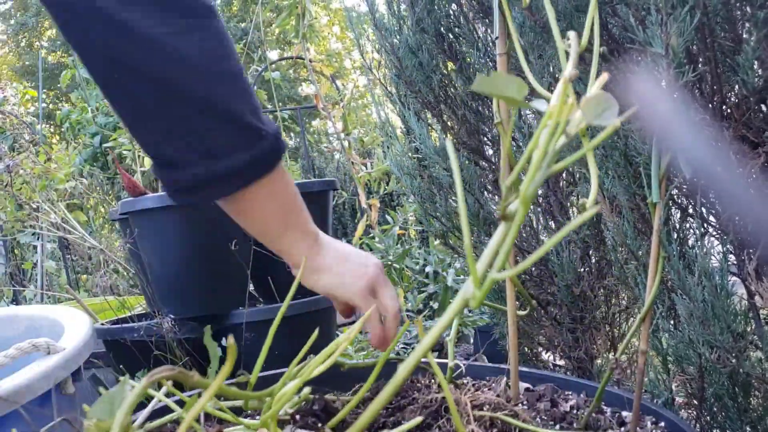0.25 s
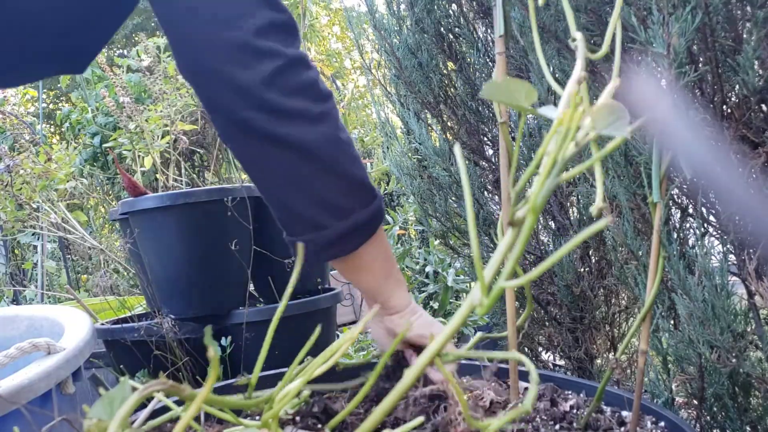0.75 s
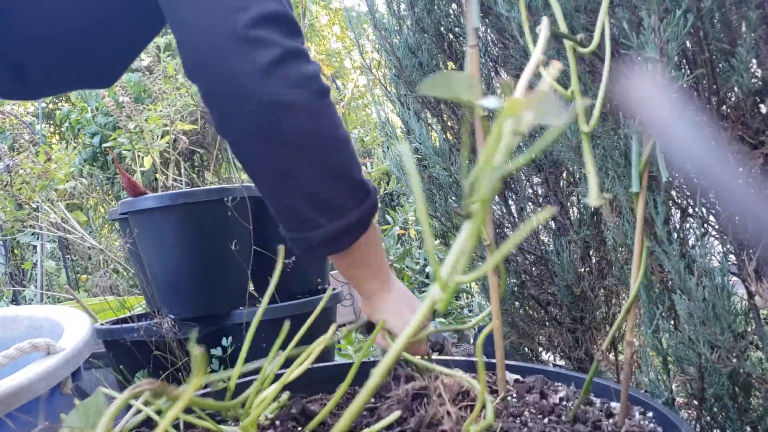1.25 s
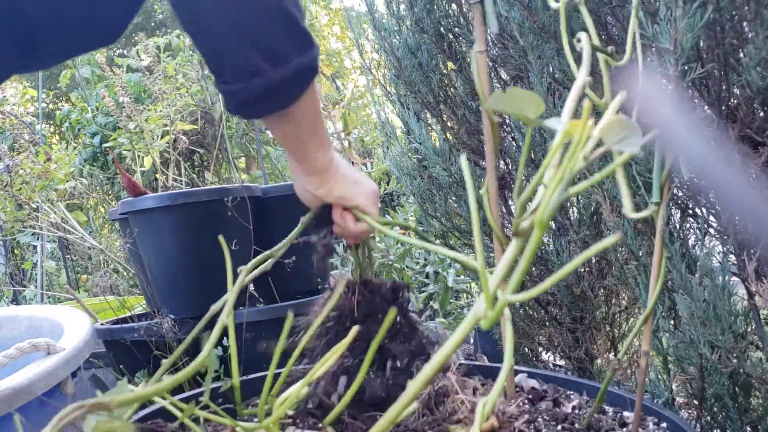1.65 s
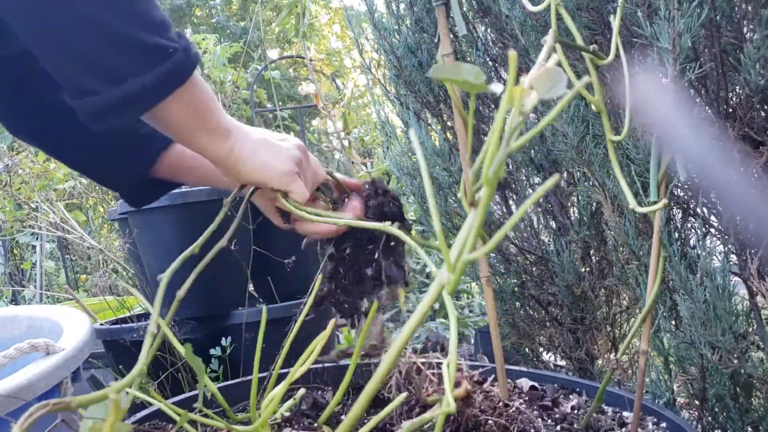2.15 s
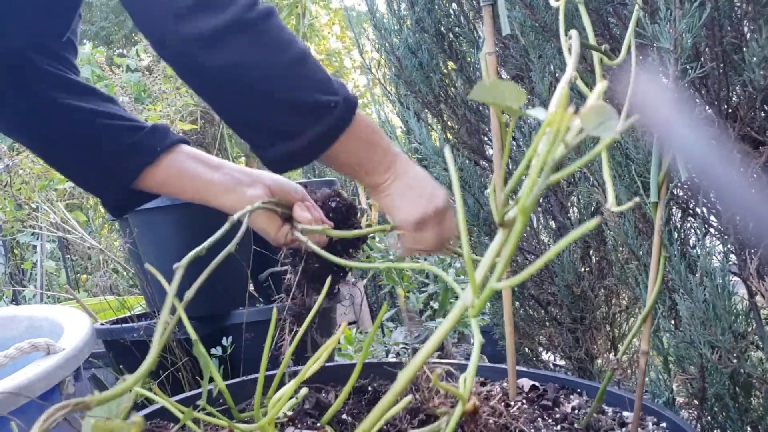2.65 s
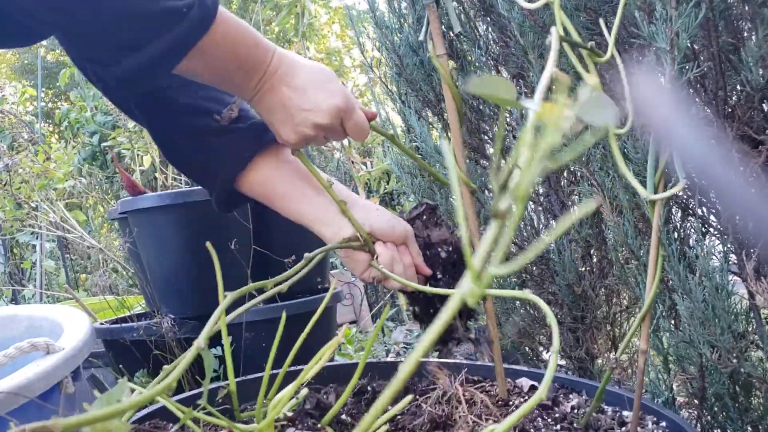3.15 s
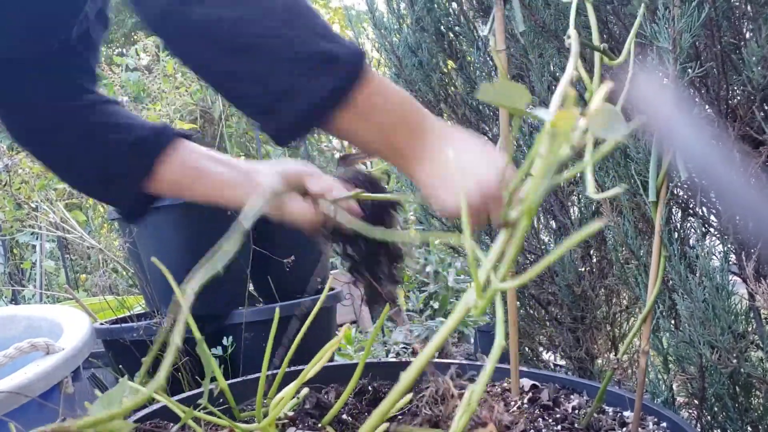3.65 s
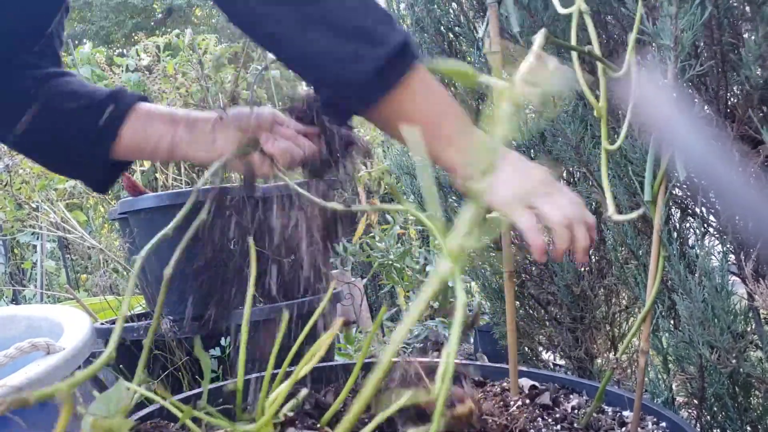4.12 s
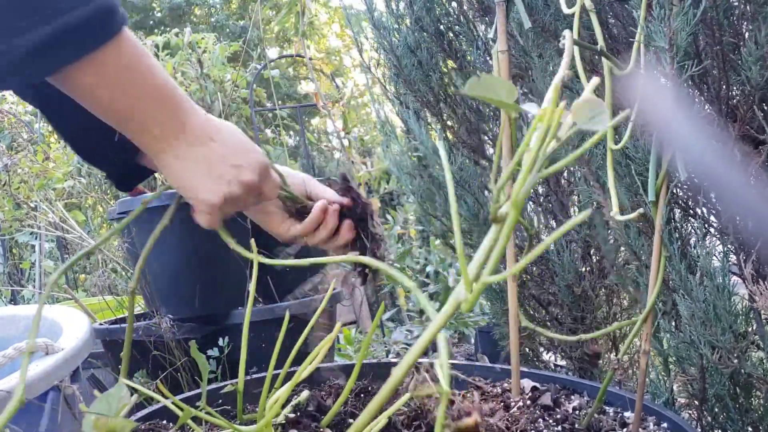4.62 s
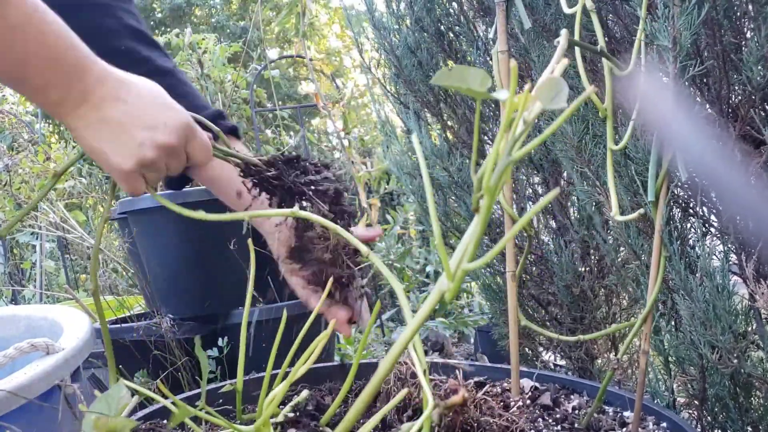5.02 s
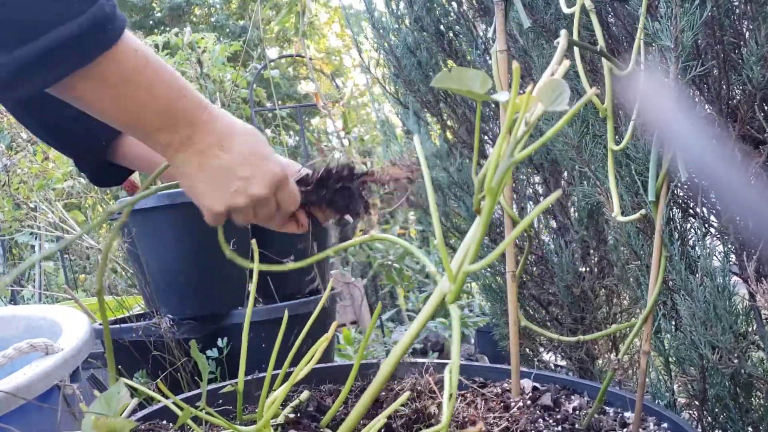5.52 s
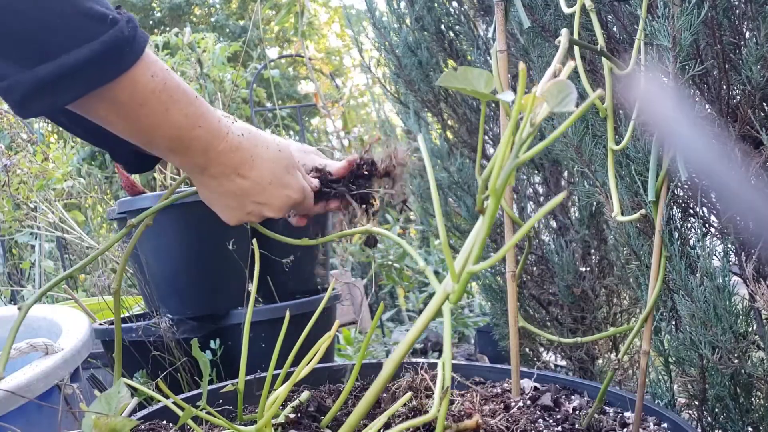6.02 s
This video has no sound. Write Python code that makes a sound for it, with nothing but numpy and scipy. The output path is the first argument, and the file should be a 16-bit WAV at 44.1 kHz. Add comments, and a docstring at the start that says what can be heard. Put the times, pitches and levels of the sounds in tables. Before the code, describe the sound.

Close, dry crackle of breaking roots, crumbling clods and spilling soil grains outdoors, with a faraway motor throbbing low underneath.

```python
"""Close to a tub of potting soil, hands work a root ball loose, with an engine droning and rumbling far off.
A few crumbs trickle and foliage rubs the sleeve; at half a second the first pull tears hair roots.
Thicker roots snap as ragged bursts of noise, the loudest near 3.9 s, and jolts spill grains of soil.
A breeze thuds on the right microphone from about one second on, in puffs of low noise.
From 1.3 s clods knock, as damped tones, and crunch as they fall apart."""
import sys
import numpy as np
from scipy import signal
from scipy.fft import rfft, irfft
from scipy.io import wavfile
from scipy.ndimage import map_coordinates

SR = 44100
rng = np.random.default_rng(int(sys.argv[2]) if len(sys.argv) > 2 else 0)


def to_wav(sig):
    """Store sig (one row per channel, or 1-D mono) as 16-bit WAV at the path in sys.argv[1].

    Samples outside -1..1 are clipped; the rate is SR.
    """
    pcm = np.clip(np.atleast_2d(sig), -1, 1) * 32767
    pcm = np.round(pcm).astype(np.int16)
    wavfile.write(sys.argv[1], SR, pcm.T)  # frames by channels


N = 276948
TIME = np.arange(N) / SR
HALF_APART = np.array([[.5], [-.5]])  # shares a left-right difference: left up, right down


def from_db(db):
    """Decibels to gain."""
    return 10 ** (np.asarray(db) / 20)


def rms_one(x):
    """Scale to rms 1."""
    return x / np.sqrt(np.mean(x ** 2) + 1e-20)


def in_time(rows):
    """Each column of a curve, interpolated at every sample."""
    seconds, *columns = np.transpose(rows)
    return [np.interp(TIME, seconds, column) for column in columns]


def drift(rate):
    """Slow random motion of spread 1, through rate random points per second."""
    knots = rng.standard_normal(4096)
    slow = map_coordinates(knots, [TIME[::32] * rate], order=3, mode="wrap")
    return rms_one(slow).repeat(32)[:N]


def colour(x, spectrum, size=1024):
    """Causal (minimum-phase) filter per channel; the two together keep the mean power of white noise."""
    hz, *sides = np.transpose(spectrum)
    log_hz = np.log(np.maximum(np.arange(size // 2 + 1) * SR / size, 1))
    gain = from_db([np.interp(log_hz, np.log(hz), db) for db in sides])
    # folding the cepstrum onto positive time gives minimum phase
    cepstrum = irfft(np.log(gain))
    cepstrum[:, 1:size // 2] *= 2
    cepstrum[:, size // 2 + 1:] = 0
    pulse = rms_one(irfft(np.exp(rfft(cepstrum)))) / np.sqrt(size)
    return signal.fftconvolve(np.broadcast_to(x, (2, N)), pulse, axes=1)[:, :N]


def add(track, s, sound):
    """Mix a short sound in at time s."""
    start = int(np.clip(s * SR, 0, N - 1))
    track[:, start:start + sound.shape[-1]] += sound[..., :N - start]


def scatter(x, t60, wet_db):
    """Pots, leaves and arms throw back a short diffuse tail, different on each side."""
    t = TIME[:SR // 4]
    tail = rng.standard_normal((2, len(t))) * from_db(-60 * t / t60)
    tail = rms_one(tail) / np.sqrt(len(t))
    return x + from_db(wet_db) * signal.fftconvolve(x, tail, axes=1)[:, :N]


def grains(per_s, spread_db, clump_db, clump_rate, pan_db, count=7):
    """Tiny fractures of uneven size that come in clumps, each ringing briefly in one of several bands; rms 1."""
    born = rng.random(N) < per_s / SR
    own_db = spread_db * np.minimum(rng.exponential(1, N), 3)
    shared_db = clump_db * np.minimum(drift(clump_rate), 2)
    pan = from_db(pan_db * rng.uniform(-1, 1, N) * [[1], [-1]])
    clicks = born * from_db(own_db + shared_db) * rng.choice([-1, 1], (2, N)) * pan
    edges = np.linspace(np.sqrt(200), np.sqrt(17000), count + 1) ** 2
    dealt, out = rng.integers(0, count, N), 0
    for k in range(count):
        band = signal.butter(2, edges[k:k + 2], "band", fs=SR, output="sos")
        out = out + signal.sosfilt(band, clicks * (dealt == k) + 1e-18)
    return rms_one(out)


def gesture(start, db, attack_s, hold_s, fall_db_per_s):
    """Gain that rises, holds until hold_s after the start, then dies away."""
    t = TIME - start
    rise = np.clip(t / attack_s, 0, 1)
    return rise * from_db(db - fall_db_per_s * np.maximum(t - hold_s, 0))


def together(gains):
    """Unrelated noises add in power."""
    return np.sqrt(sum(gain ** 2 for gain in gains))


def engine(waver_db=1.97, lag_s=0.00033, apart_db=2.5):
    """Tones on the multiples of the cycle rate beat together in a soft throb, later on the left microphone."""
    # Engine speed. Each row: time in seconds, working cycles per second.
    speed_curve = [(0, 25.0), (.5, 24.95), (1.4, 24.8), (1.8, 24.5), (2.35, 24.85), (3.2, 24.55),
                   (3.5, 24.7), (4.0, 24.6), (4.6, 25.1), (5.1, 25.45), (5.5, 25.4), (5.8, 25.0),
                   (6.28, 25.3)]
    # Distant loudness. Each row: time in seconds, level of the main tone (4th multiple) in dB, its octave in dB.
    main_levels = [(0.08, -42, -51), (0.67, -41, -51), (1.01, -43, -47), (2.42, -37.5, -54),
                   (2.87, -39.5, -51), (4.37, -38, -51.5), (4.64, -37.5, -61), (5.14, -42, -52),
                   (5.28, -50, -53.5), (5.55, -43, -62), (5.92, -40.5, -53.5), (6.14, -46, -57)]
    # The other tones. Each row: multiple of the cycle rate, level in dB before fading.
    other_tones = [(2, -58), (3, -55), (5, -48.5), (6, -53), (7, -56), (9, -67.5), (10, -86), (12, -52.5),
                   (13, -69.5)]
    speed = in_time(speed_curve)[0]
    turns = np.cumsum(speed) / SR - lag_s * speed * np.array([[1], [0]])
    main_db, octave_db = in_time(main_levels)
    # moving air makes each of the other tones fade and wander a little
    fade_db = .25 * (main_db - main_db.mean())
    tones = [(order, db + fade_db + waver_db * drift(3.033)) for order, db in other_tones]
    tones += [(4, main_db), (8, octave_db)]
    out = np.zeros((2, N))
    for order, db in tones:
        # the exhaust pipe smears each pulse: the higher tones come out later
        phase = -.45 * (order - 4) ** 2 + .2 * drift(4)
        sides = apart_db * drift(1.725) * HALF_APART
        out -= from_db(db + sides) * np.cos(2 * np.pi * order * turns + phase)
    return np.sqrt(2) * out


def background(apart_db=-9, air_db=-56):
    """Low distant rumble, nearly alike on both microphones, under a faint hiss."""
    # Rumble spectrum. Each row: frequency in Hz, relative level in dB per Hz.
    rumble = [(20, -50), (35, -0.5), (55, 7), (90, 5), (140, -4), (220, -4), (270, -10.5), (330, -9.5),
              (420, -21), (600, -24), (1000, -40.5)]
    # Garden air and hiss. Each row: frequency in Hz, left and right relative level in dB per Hz.
    air = [(382, 2.5, 2), (524, -9, -10), (1000, -15.5, -17.5), (1520, -4.5, -16.5), (2350, -23.5, -18),
           (4720, -47, -11.5), (7000, -17, -25), (8750, -45, -82), (11300, -43, -22), (15500, -20, -48)]
    # Swell of the rumble. Each row: time in seconds, level in dB.
    swell = [(0, -45.5), (.8, -43), (1.5, -43), (2.4, -46), (3.5, -46.5), (4.2, -41), (5.0, -44),
             (5.7, -48.5), (6.28, -45)]
    noise = rng.standard_normal(N) + from_db(apart_db) * rng.standard_normal(N) * [[1], [-1]]
    lowpass = signal.butter(2, 900, fs=SR, output="sos")
    low = signal.sosfilt(lowpass, colour(noise, rumble, size=8192))
    hiss = colour(rng.standard_normal((2, N)) + 0.34 * rng.standard_normal(N), air)
    return from_db(in_time(swell)[0]) * rms_one(low) + from_db(air_db) * rms_one(hiss)


def soil_flow(attack_s=0.021, idle_db=-71):
    """Gain of the falling soil, left and right: jolts spill soil over a thin steady trickle."""
    # Each row: start in seconds, level in dB, time pouring in seconds, fall in dB per second,
    # left-right difference in dB.
    spill_rows = [(-.03, -62.5, 0.18, 90, 13.5), (.54, -53, 0.2, 16, -2), (1.27, -49, 0.035, 58, -5),
                  (1.46, -50, .16, 25, -1.5), (1.78, -57.5, 0.34, 160, -4), (2.27, -57.5, 0.064, 140, 1),
                  (2.73, -59.5, 0.053, 18, 0), (3.53, -61, 0.054, 119, -3), (3.7, -63, 0.21, 50, 0.5),
                  (3.895, -50.5, 0.042, 15, 0.5), (4.17, -49, 0.46, 35, 0), (5.28, -58.5, 0.1, 90, 2),
                  (5.49, -58.5, 0.068, 49, -2)]
    spills = [gesture(s, db + pan_db * HALF_APART, attack_s, hold_s, fall)
              for s, db, hold_s, fall, pan_db in spill_rows]
    return together([from_db(idle_db)] + spills)


def soil(coarse_db=-3):
    """Fine soil trickles as dense small fractures, with sparser, coarser crumbs ticking through it."""
    # Falling and rubbed soil. Each row: frequency in Hz, left and right relative level in dB per Hz.
    soil_spectrum = [(243, -27.5, -13.5), (600, 3, -2), (1200, -8, -8), (1900, -4, -9), (3160, -10, -9.5),
                     (4930, -11, 0), (6400, -2, -2.5), (8460, -7, -21), (10100, 1.5, -6), (12750, 6, -2),
                     (16600, 1.5, -27)]
    flow = soil_flow()
    fine = grains(per_s=10000, spread_db=4, clump_db=2.5, clump_rate=200, pan_db=3)
    coarse = grains(per_s=1200, spread_db=4.5, clump_db=3.8, clump_rate=140, pan_db=4)
    return colour(flow * (fine + from_db(coarse_db) * coarse), soil_spectrum)


def leaves(attack_s=0.02, fall_db_per_s=41, idle_db=-70):
    """Soft, uneven friction of foliage against the sleeve, a mass of small slips."""
    # Arm sweeps through stems and leaves. Each row: start in seconds, level in dB, length in seconds.
    sweep_rows = [(0.224, -62, 0.082), (1.32, -58, 0.46), (1.84, -60.5, 0.39), (3.925, -60, 0.85)]
    # Brushing. Each row: frequency in Hz, left and right relative level in dB per Hz.
    brush_spectrum = [(800, -8, -27.5), (2040, -6, -8.5), (3700, 0, 4.5), (5900, -4, 5), (7330, -2, 0),
                      (9200, -16, -34), (14500, 0.5, -16)]
    sweeps = [gesture(s, db, attack_s, hold_s, fall_db_per_s) for s, db, hold_s in sweep_rows]
    rub = grains(per_s=5000, spread_db=3.5, clump_db=1.5, clump_rate=90, pan_db=3)
    return colour(together([from_db(idle_db)] + sweeps) * rub, brush_spectrum)


def rootlets(per_s=7, mean_db=-53.5, spread_db=2, t60_s=.005, tilt_db=7, pan_spread_db=4, follow=0.74):
    """Rootlets part at random moments, stronger while much soil is moving; rows as in snaps()."""
    flow_db = 20 * np.log10(soil_flow().mean(axis=0))
    draws = rng.random((200, 4))
    times = np.cumsum(-np.log(1 - draws[:, 0])) / per_s
    strength, tilt, pan = (2 * draws[:, 1:] - 1).T
    # follow is the share of the soil flow's swing that the ticks take on
    swing_db = follow * np.interp(times, TIME, flow_db - flow_db.mean())
    db = mean_db + spread_db * strength + swing_db
    t60s = np.full_like(times, t60_s)
    rows = np.transpose([times, db, t60s, tilt_db * (1 + tilt), pan_spread_db * pan])
    return [tuple(row) for row in rows if row[0] < TIME[-1]]


def snaps(ragged_db=4, split_hz=8000, rise_share=0.031):
    """A root breaks in a ragged burst of fibres; the tougher it is, the slower the burst builds and dies."""
    # Roots and stems. Each row: time in seconds, level in dB before tilt and colour, time to fall 60 dB
    # in seconds, tilt to the treble in dB, left-right difference in dB.
    snap_rows = [(0.572, -41.5, .011, -22, 3), (.663, -33.5, .012, -12, -2), (.737, -35, .008, 2, -10),
                 (0.8598, -29, 0.028, 0, 0.5), (0.9198, -33, 0.0028, 7, -4), (1.071, -44.5, .005, 23, 1),
                 (1.282, -37.5, 0.015, -6, 3), (1.298, -22.5, 0.014, -3, 4),
                 (1.4757, -39.5, .0045, -22, -11), (1.642, -33, 0.0053, -11, -10),
                 (1.716, -35.5, 0.005, 10, 6), (2.049, -35, 0.0025, 15, 7), (2.0765, -39, .008, 12, -4),
                 (2.38, -46.5, 0.0096, 25, 0), (2.742, -34.5, 0.023, 18, 2), (2.764, -35.5, 0.015, -8, -6),
                 (2.796, -30, 0.0072, 5, 1), (2.809, -32, 0.014, 5, -2), (2.8365, -44, 0.0074, 20, 5),
                 (2.8745, -38.5, 0.0051, 12, 7), (3.0808, -32, 0.0051, 9, 4), (3.114, -37.5, 0.013, 5, -4),
                 (3.1461, -27.5, 0.01, 8.5, -1), (3.3458, -39.5, 0.005, 2, -4), (3.71, -48, .012, 13, -1),
                 (3.8052, -41, 0.0066, 18, 3), (3.9037, -14.5, 0.0077, -6, 0), (3.977, -29, .01, 8, -2.5),
                 (4.114, -39, 0.02, -9, 0), (4.206, -41.5, 0.014, -24, -9), (4.27, -36.5, .005, -14, -11),
                 (4.3052, -21, 0.0055, -3, -1), (4.604, -42, 0.022, -18, -8), (4.83, -43, .008, -15, 1),
                 (5.3793, -38.5, 0.015, 16, 11), (5.3967, -34.5, 0.02, 15.5, 12.5),
                 (5.399, -26, 0.013, -7, 0), (5.514, -36.5, .007, 3, -2), (5.771, -47.5, 0.0076, 7, 11),
                 (6.211, -43.5, .006, 1, -2)]
    # Snapping roots. Each row: frequency in Hz, left and right relative level in dB per Hz.
    snap_spectrum = [(250, -31, -27), (600, -19, -17), (1200, -20, -28), (2200, -19, -22), (3300, -22, -18),
                     (4700, -12, -8), (6300, -7, -4), (8400, -9, -20), (10500, -4, -11), (12500, 0, -9),
                     (15500, -3, -20)]
    t, out = TIME[:SR // 16], np.zeros((2, N))
    lowpass = signal.butter(2, split_hz, fs=SR, output="sos")
    highpass = signal.butter(2, split_hz, "high", fs=SR, output="sos")
    for s, db, t60, tilt_db, pan_db in [*snap_rows, *rootlets()]:
        # each fibre's strength lasts 12 samples
        fibres = from_db(ragged_db * rng.standard_normal(len(t))).repeat(12)[:len(t)]
        shape = (1 - np.exp(-t / (rise_share * t60))) * from_db(-60 * t / t60)
        burst = rng.standard_normal((2, len(t))) * fibres * shape
        # energy in proportion to the decay time
        burst *= np.sqrt(2 * SR * t60 / np.log(1e6) / np.sum(burst ** 2))
        treble = from_db(tilt_db / 2) * signal.sosfilt(highpass, burst)
        bass = from_db(-tilt_db / 2) * signal.sosfilt(lowpass, burst)
        add(out, s, (treble - bass) * from_db(db + pan_db * HALF_APART))
    return scatter(colour(out, snap_spectrum), t60=.06, wet_db=-10)


def tearing(lift_db=3, attack_s=0.01, fall_db_per_s=155):
    """Hair roots give way by the thousand as the strain builds quickly and lets go."""
    # Pulls. Each row: start in seconds, level in dB before the lift, time under strain in seconds.
    pull_rows = [(.545, -54.5, .32), (.655, -43, 0.037), (.725, -47.5, 0.078), (2.728, -51, 0.11),
                 (3.12, -59, 0.081), (5.32, -57.5, 0.086)]
    # Tearing roots. Each row: frequency in Hz, left and right relative level in dB per Hz.
    tear_spectrum = [(250, -44, -30), (600, -39, -28), (1200, -11, -15), (2100, -7, -11), (3300, -13, -6.5),
                     (4780, -12, -3.5), (6350, -7, -3.5), (8450, -11.5, -18), (11100, -0.5, -5),
                     (12400, -1, -4), (15600, -2.5, -29)]
    pull = together(gesture(s, db, attack_s, hold_s, fall_db_per_s) for s, db, hold_s in pull_rows)
    fibres = grains(per_s=9000, spread_db=5, clump_db=3.5, clump_rate=240, pan_db=4)
    return from_db(lift_db) * colour(pull * fibres, tear_spectrum)


def breeze(left_db=-19):
    """Eddies buffet the right microphone's port with short low thuds, far weaker on the left."""
    # Puffs. Each row: time of the peak in seconds, level in dB, time from the peak to 1/e in seconds.
    puffs = [(0.958, -34, 0.018), (3.954, -33.5, .04), (4.575, -46, 0.043), (2.999, -27, 0.016),
             (3.14, -33, 0.13), (3.301, -18.5, 0.0073), (3.482, -31.5, 0.07), (3.73, -33, 0.065),
             (4.779, -29, 0.011), (5.854, -41, 0.17)]
    gust = sum(from_db(db) * np.exp(-((TIME - s) / length) ** 2) for s, db, length in puffs)
    band = signal.butter(2, [45, 85], "band", fs=SR, output="sos")
    lowpass = signal.butter(2, 130, fs=SR, output="sos")
    eddies = signal.sosfilt(band, rng.standard_normal(N))
    eddies = signal.sosfilt(lowpass, np.tanh(2 * rms_one(eddies)))
    return gust * rms_one(eddies) * from_db([[left_db], [0]])


def clods(left_db=2, right_db=-3, crush_db=-1, crush_t60=0.055, crush_hz=2200):
    """Each clod gives a dull knock, quickly damped by the soil, and a short crunch as it falls apart."""
    # Clods that tear loose or land in the tub. Each row: time in seconds, level in dB before the
    # left and right gains, pitch of the knock in Hz.
    clod_rows = [(1.321, -37.5, 1520), (1.349, -30.5, 1100), (1.405, -40, 1000), (1.4215, -38.5, 600),
                 (1.475, -38.5, 1100), (1.491, -42, 1420), (1.76, -48, 1070), (3.904, -38.5, 550),
                 (4.107, -44.5, 910), (4.152, -46, 1200), (4.324, -32.5, 785), (4.325, -36.5, 1390),
                 (4.344, -43, 900), (4.603, -39.5, 800), (4.635, -39.5, 500), (4.829, -43.5, 1850)]
    # Modes of a knock. Each row: ratio to its pitch, relative level in dB, time to fall 60 dB in seconds.
    knock_modes = [(.52, -1.5, 0.0055), (1, -1.5, 0.017), (1.8, -10, 0.0057)]
    t, out = TIME[:SR // 12], np.zeros((2, N))
    dull = signal.butter(1, [450, crush_hz], "band", fs=SR, output="sos")
    for s, db, hz in clod_rows:
        knock = sum(from_db(mode_db - 60 * t / t60) * np.sin(2 * np.pi * hz * ratio * t)
                    for ratio, mode_db, t60 in knock_modes)
        crush = signal.sosfilt(dull, rng.standard_normal((2, len(t))) * from_db(-60 * t / crush_t60))
        add(out, s, from_db(db) * (knock + from_db(crush_db) * crush))
    return scatter(out, t60=.04, wet_db=-10) * from_db([[left_db], [right_db]])


def scene():
    """The work at the tub over the sounds of the garden."""
    garden = engine() + background() + breeze()
    return garden + soil() + leaves() + snaps() + tearing() + clods()


def record(dry):
    """The deepest bass is rolled off below 30 Hz and the top is cut steeply above 16 kHz."""
    dry = signal.sosfilt(signal.butter(2, 30, "high", fs=SR, output="sos"), dry)
    return signal.sosfilt(signal.ellip(12, .2, 80, 16000, fs=SR, output="sos"), dry)


dry = scene()
out = record(dry)
to_wav(out)
```